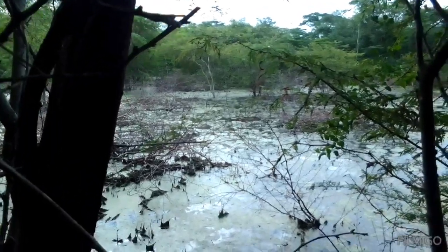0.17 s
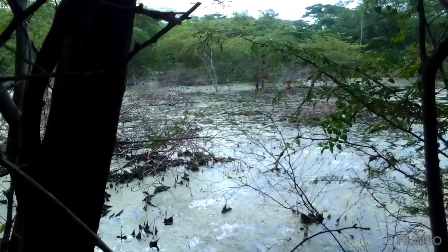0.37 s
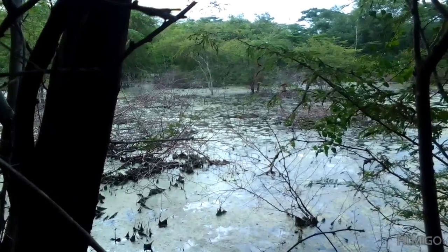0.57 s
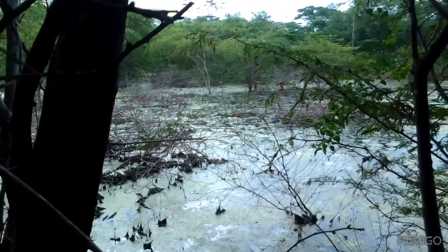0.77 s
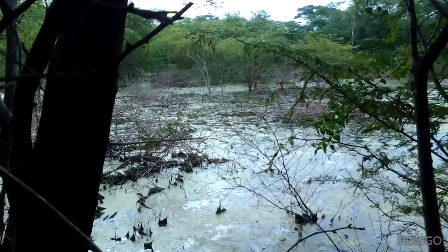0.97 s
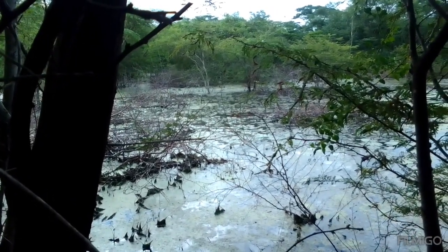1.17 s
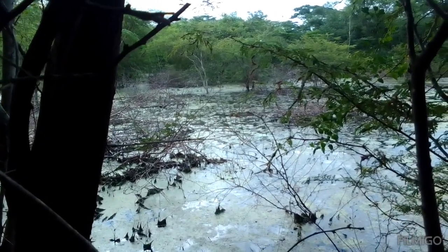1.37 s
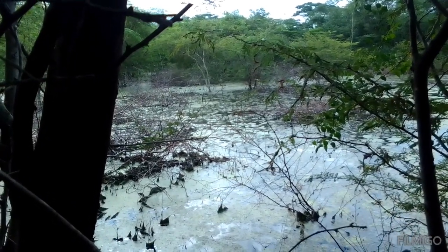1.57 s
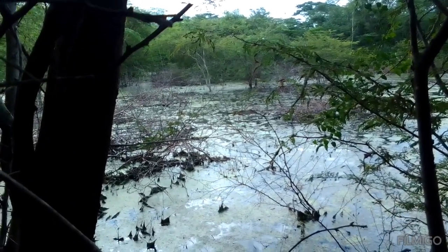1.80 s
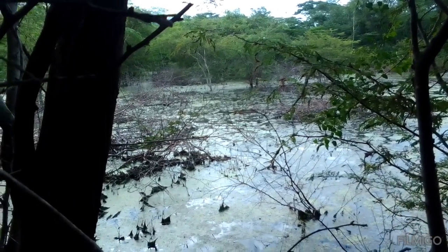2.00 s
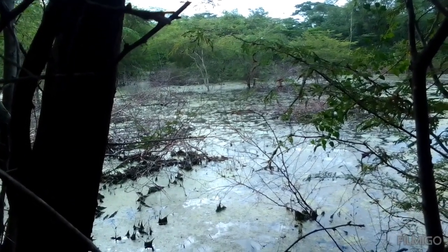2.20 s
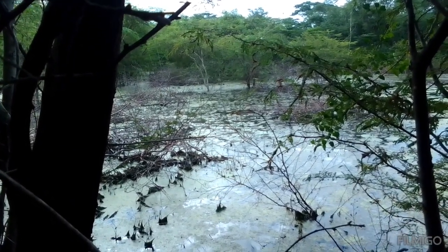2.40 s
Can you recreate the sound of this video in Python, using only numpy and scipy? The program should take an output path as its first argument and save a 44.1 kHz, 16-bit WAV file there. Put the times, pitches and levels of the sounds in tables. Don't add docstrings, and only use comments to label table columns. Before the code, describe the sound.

Small marsh birds whistle quick, high, arched notes in a steady pulse, with one twig snap

```python
import sys
import numpy as np
from scipy import signal
from scipy.io import wavfile
from scipy.ndimage import uniform_filter1d

SR = 44100
rng = np.random.default_rng(int(sys.argv[2]) if len(sys.argv) > 2 else 0)


def volts_from_decibels(level):
    exponent = np.asarray(level, float) / 20
    return 10 ** exponent


def int16_out(signal):
    q = np.round(np.clip(np.atleast_2d(signal).T, -1, 1) * 32767)
    wavfile.write(sys.argv[1], SR, q.astype(np.int16))


N = 108045

# length_share, pitch_ratio (to top), level_db
ARCHED_CONTOUR = [(0, .87, -24), (.1, .965, -6), (.27, 1.001, 0), (.43, .99, -1), (.68, .92, -6),
                  (.8, .85, -18), (.87, .71, -34), (1, .65, -32)]


def evened(x):
    return x / np.sqrt(np.mean(x ** 2) + 1e-20)


def add(mix, s, sound):
    part = mix[round(s * SR):][:len(sound)]
    part += sound[:len(part)]


def drift(count, seconds):
    size = max(int(seconds * SR), 2)
    noise = rng.standard_normal(6000)
    return evened(uniform_filter1d(uniform_filter1d(noise, size), size))[:count]


def resonate(x, hz, width_hz):
    turn = np.exp(2j * np.pi * hz * np.arange(len(x)) / SR)
    r = np.exp(-np.pi * width_hz / SR)
    slow = signal.lfilter([1], [1, -2 * r, r * r], x / turn)
    return 2 * (turn * slow).real * (1 - r) ** 2


def whistle(hz, db):
    hz = hz * (1 + .003 * drift(len(hz), .006))
    level_db = db + 2 * drift(len(hz), .0024)
    return np.sqrt(2) * volts_from_decibels(level_db) * np.sin(2 * np.pi * np.cumsum(hz) / SR)


def caller(notes, contour):
    out = np.zeros(N)
    share, ratio, contour_db = np.transpose(contour)
    for start, length, db, top_hz in notes:
        t = np.arange(0, 1, 1 / (SR * length))
        size = len(t) // 24
        pitch = uniform_filter1d(np.interp(t, share, ratio), size, mode="nearest")
        level_db = uniform_filter1d(np.interp(t, share, contour_db), size, mode="nearest")
        edge = np.minimum(1, np.minimum(t, 1 - t) * 30)
        add(out, start, edge * whistle(top_hz * pitch, db + level_db))
    return out


def near_birds():
    # length_share, pitch_ratio, level_db
    steady_contour = [(0, .72, -38), (.03, .87, -13), (.2, .93, -3), (.4, .96, -1), (.56, 1.001, 0),
                      (.7, .98, -1), (.9, .885, -13), (1, .67, -38)]
    # length_share, pitch_ratio, level_db
    hump_contour = [(0, .72, -36), (.05, .91, -11), (.22, 1.001, -1), (.6, .985, -2), (.85, .95, 0),
                    (1, .95, -12)]
    # start_s, length_s, level_db, top_hz
    steady_calls = [(.062, 0.13, -54.5, 5073), (.292, 0.12, -52, 5112), (.512, 0.11, -51, 5206),
                    (.724, 0.11, -49, 5293), (.932, 0.11, -51.5, 5210), (1.137, 0.11, -52, 5190),
                    (1.357, 0.11, -56, 5015), (1.585, 0.13, -53.5, 5087), (1.821, 0.12, -54, 5088),
                    (2.046, .11, -54, 5046), (2.271, 0.12, -55, 5052)]
    # start_s, length_s, level_db, top_hz
    arched_calls = [(.062, 0.087, -58.5, 5245), (.445, 0.044, -56, 5210), (.632, 0.037, -52, 5120),
                    (.728, 0.06, -57, 5400), (.808, 0.055, -47, 5390), (.882, 0.1, -61.5, 5294),
                    (1.002, 0.049, -45, 5488), (1.17, 0.063, -45, 5393), (1.357, .06, -45.5, 5467),
                    (1.545, 0.069, -48, 5227), (1.76, .053, -47.5, 5070), (1.985, 0.056, -51, 5020),
                    (2.048, 0.049, -69.5, 5400), (2.222, 0.071, -57.5, 5108), (2.4, 0.058, -53, 4985)]
    # start_s, length_s, level_db, top_hz
    hump_calls = [
        (.572, 0.0423, -46.5, 5195),
        (.95, 0.11, -59.5, 4820),
        (1.127, 0.043, -48, 5333),
        (1.314, 0.064, -51, 5280),
        (2.194, 0.049, -64, 4784),
        (2.368, 0.0316, -58.5, 4990),
    ]
    steady = caller(steady_calls, steady_contour)
    return steady + caller(arched_calls, ARCHED_CONTOUR) + caller(hump_calls, hump_contour)


def far_birds():
    # start_s, length_s, level_db, top_hz
    far_calls = [(.199, 0.048, -54, 5450), (.264, 0.053, -56, 5230), (.665, 0.049, -62, 5100),
                 (.845, 0.047, -65, 4990), (.468, 0.06, -61.5, 5010), (1.058, 0.051, -61, 5240),
                 (1.222, 0.048, -60, 5340), (1.48, 0.041, -67, 5010), (1.708, 0.085, -64, 5210),
                 (1.7, 0.068, -65.5, 4850), (1.875, 0.063, -71, 5430)]
    # length_share, pitch_ratio, level_db
    pointed_contour = [(0, .78, -14), (.35, .99, -1), (.55, 1.001, 0), (.8, .87, -5), (1, .8, -14)]
    # start_s, length_s, level_db, top_hz
    pointed_calls = [
        (2.243, 0.044, -70, 4190),
    ]
    return caller(far_calls, ARCHED_CONTOUR) + caller(pointed_calls, pointed_contour)


def peeps():
    # start_s, length_s, level_db, first_hz,
    # last_hz
    peep_notes = [(.004, 0.032, -54.5, 5190, 5190), (0.024, 0.08, -61.5, 4860, 4540),
                  (0.156, 0.067, -74.5, 5500, 5400), (.17, .045, -64, 4800, 4935),
                  (0.232, 0.037, -61, 5060, 5400), (0.254, 0.034, -65.5, 6060, 6150),
                  (0.3, 0.025, -76, 6060, 6100), (0.346, 0.041, -65.5, 5530, 5620),
                  (0.377, .026, -55.5, 5250, 5710), (.396, 0.031, -53.5, 5550, 4845),
                  (0.415, 0.028, -56.5, 4850, 5450), (0.39, 0.015, -70.5, 6100, 5940),
                  (0.434, 0.032, -69.5, 6320, 5960), (0.475, 0.054, -80, 5620, 5400),
                  (0.516, 0.034, -77, 4840, 5550), (0.537, .045, -61.5, 5614, 5550),
                  (0.613, 0.024, -53, 4926, 5400), (0.62, 0.047, -68.5, 6170, 5860),
                  (0.702, 0.032, -59, 4780, 5270), (0.758, 0.037, -57.5, 5317, 5260),
                  (0.938, 0.034, -56, 4600, 5250), (.948, 0.024, -51, 4760, 4780),
                  (1.435, 0.027, -59.5, 4900, 4620), (1.45, 0.1, -86.5, 5450, 5720),
                  (1.522, 0.044, -68.5, 4770, 5240), (1.532, .032, -55, 4500, 5130),
                  (1.686, 0.014, -55.5, 4800, 4650), (2.01, .05, -57, 5020, 4875),
                  (0.33, .018, -84, 3900, 3800), (0.687, 0.026, -81, 3940, 3900),
                    (1.101, 0.017, -78.5, 3940, 3540), (1.268, 0.019, -78, 3700, 3515),
                    (1.405, 0.015, -76.5, 3860, 3500), (1.428, 0.012, -80, 3500, 3490),
                    (1.512, 0.038, -74.5, 3600, 4290), (1.566, .035, -75, 4000, 4520),
                    (1.725, 0.032, -75, 3430, 3964), (.402, 0.016, -83, 4200, 3480),
                    (1.62, .06, -70, 4700, 4780), (2.07, 0.062, -62, 4950, 4680),
                    (.86, 0.025, -71, 5300, 5040), (1.755, 0.033, -86, 3790, 3600),
                    (1.945, 0.063, -80.5, 3350, 3660), (1.977, 0.021, -72.5, 3550, 4750)]
    edge_s = .01
    out = np.zeros(N)
    for start, length, db, first_hz, last_hz in peep_notes:
        t = np.arange(0, length, 1 / SR)
        edge = np.sin(np.pi / 2 * np.clip(np.minimum(t, length - t) / edge_s, 0, 1)) ** 2
        add(out, start, edge * whistle(first_hz + (last_hz - first_hz) * t / length, db))
    return out


def woods():
    t = np.arange(SR // 2) / SR
    tail_t60, early_t60, early_db, gap_s = .19, .07, 4, .004
    decay = volts_from_decibels(-60 * t / tail_t60) + volts_from_decibels(early_db - 60 * t / early_t60)
    sparse = rng.standard_normal(len(t)) * (rng.random(len(t)) < .12)
    taps = sparse * decay * (t > gap_s)
    return taps / np.linalg.norm(taps)


def twig():
    # mode_hz, level_db, t60_s
    twig_modes = [(6450, 13.5, 0.00205), (5400, -4, 0.0063), (7740, -4, 0.00091), (6016, -12, 0.0083),
                  (1758, -8, 0.0023), (2667, -11.5, 0.0022), (4100, -11, 0.001), (10900, -19.5, 0.00063),
                  (1080, -29.5, 0.0054), (13500, -25.5, .001), (330, -32.5, 0.004)]
    crack_times = [
        .2193,
        .2214,
        .22302,
        .2243,
        .2268,
    ]
    crack_levels = [
        -45,
        -40,
        -6,
        -33,
        -34.5,
    ]
    # start_s, level_db
    faint_ticks = [(.068, -60), (.091, -58), (.103, -58), (.121, -59), (.151, -57), (.16, -60), (.174, -59),
                   (.195, -56), (.241, -57)]
    rise_s, top_hz = .00026, 9700
    t = np.arange(1500) / SR
    ring = sum(volts_from_decibels(db - 60 * t / t60) * np.sin(2 * np.pi * hz * t) for hz, db, t60 in twig_modes)
    ring = ring * np.sin(np.pi / 2 * np.minimum(t / rise_s, 1)) ** 2
    ring = signal.lfilter(*signal.butter(2, top_hz, fs=SR), ring)
    ring = signal.lfilter(*signal.iirnotch(3350, 3.5, SR), ring)
    out = np.zeros(N)
    for s, db in list(zip(crack_times, crack_levels)) + faint_ticks:
        add(out, s, volts_from_decibels(db) * ring / abs(ring).max())
    return signal.lfilter(*signal.butter(2, 450, "high", fs=SR), out)


def rustles():
    # start_s, length_s
    clump_times = [(.02, .31), (.13, .08), (.225, .05), (.38, .16), (1.665, .065), (1.6, .014),
                   (1.585, .09), (.55, .45), (.722, .012), (1.385, .012), (.29, .1), (.205, .025)]
    # level_db, centre_hz, width_hz
    clump_bands = [(-73, 5300, 3600), (-87, 2200, 4100), (-77.5, 1300, 890), (-78.5, 310, 630),
                   (-74, 7890, 1000), (-76, 1700, 730), (-82, 260, 510), (-89.5, 570, 600),
                   (-79.5, 3450, 700), (-81, 1200, 2000), (-76, 443, 150), (-85.5, 318, 100)]
    clicks_per_s, click_db, bed_gain = 8400, 6, .3
    out = np.zeros(N)
    for (start, length), (db, hz, width_hz) in zip(clump_times, clump_bands):
        chance, size, bed = rng.random(20000), rng.exponential(1, 20000), rng.standard_normal(20000)
        clicks = (chance < clicks_per_s / SR) * volts_from_decibels(click_db * np.minimum(size, 3)) * np.sign(bed)
        rubbed = evened(resonate(clicks + bed_gain * bed, hz, width_hz))
        t = np.arange(0, 1, 1 / (SR * length))
        add(out, start, volts_from_decibels(db) * np.sin(np.pi * t) * rubbed[:len(t)])
    return signal.lfilter(*signal.butter(2, 190, "high", fs=SR), out)


def air():
    # point_hz, density_db (per Hz)
    hiss_colour = [(25, 5.5), (85, -24), (100, -6.5), (160, -41), (230, -2.5), (1700, -9.5), (3000, -14),
                   (15800, -19)]
    swell_db, swell_top_hz = 9.5, 2500
    frames, hz = N // 256 + 5, np.fft.rfftfreq(1024, 1 / SR)
    real, imaginary, patches = rng.standard_normal((frames, 513, 3)).T
    patches = evened(uniform_filter1d(uniform_filter1d(patches, 12, 0), 14, 1))
    f, db = np.transpose(hiss_colour)
    hz = hz[:, None]
    colour_db = np.interp(np.log(hz + 1), np.log(f + 1), db)
    gust_db = swell_db * patches.mean(0) / (1 + (hz / swell_top_hz) ** 2)
    spectrum = (real + 1j * imaginary) * volts_from_decibels(colour_db + .68 * patches + gust_db)
    hiss = signal.istft(spectrum, nperseg=1024, noverlap=768)[1][:N]
    return volts_from_decibels(-81) * evened(hiss)


def distant_chorus():
    hz, width_hz = 5020, 300
    blur = resonate(resonate(rng.standard_normal(N), hz, width_hz), hz, width_hz)
    return volts_from_decibels(-83) * evened(blur)


def scene():
    close = twig() + rustles() + air() + distant_chorus()
    echoes = woods()
    near, far, peep = near_birds(), far_birds(), peeps()
    sent = volts_from_decibels(-6) * near + volts_from_decibels(-5) * far + volts_from_decibels(-10) * peep
    return (near + far + peep + signal.fftconvolve(sent, echoes)[:N] + close)[None]


def band_limit(x):
    return signal.sosfilt(signal.butter(12, 15750, fs=SR, output="sos"), x)


def record(dry):
    from_hz, to_hz = 5600, 7600
    hz, _, z = signal.stft(dry[0], SR, nperseg=1024, noverlap=768)
    power = abs(z) ** 2
    call_power = power[(hz > 4400) & (hz < from_hz)].sum(0)
    call_db = 10 * np.log10(uniform_filter1d(call_power, size=5) + 1e-14)
    band_power = uniform_filter1d(uniform_filter1d(power, size=9, axis=0), size=3, axis=1)
    band_db = 10 * np.log10(band_power + 1e-14)
    hz = hz[:, None]
    limit_db = call_db - 49 - 8 * (hz - from_hz) / 1000
    masked = np.clip((limit_db - band_db) / 2, 0, 1) * ((hz > from_hz) & (hz < to_hz))
    kept = signal.istft(z * volts_from_decibels(-28 * masked), SR, nperseg=1024, noverlap=768)[1][:N]
    fade_out_s = .012
    kept = kept * np.minimum(np.arange(N)[::-1] / (fade_out_s * SR), 1)
    return band_limit(kept[None])


dry = scene()
out = record(dry)
int16_out(out)
```